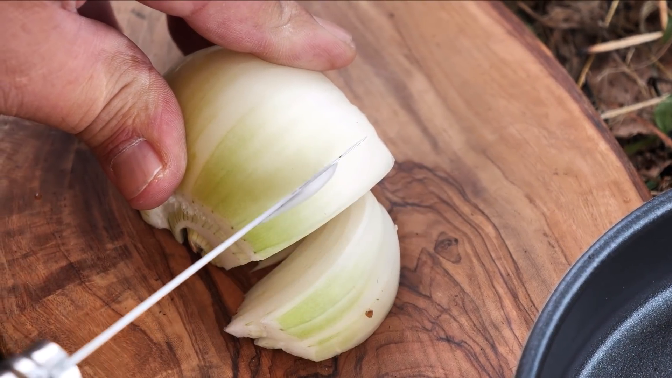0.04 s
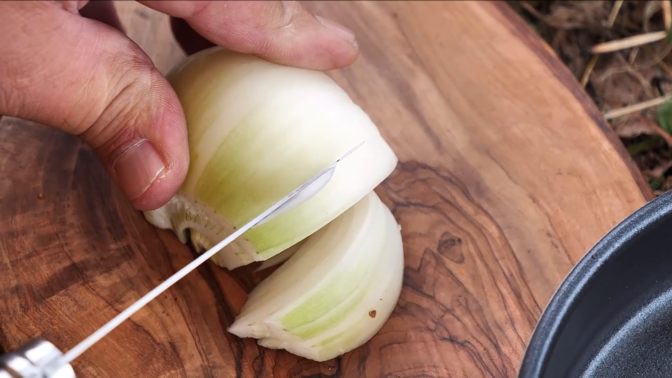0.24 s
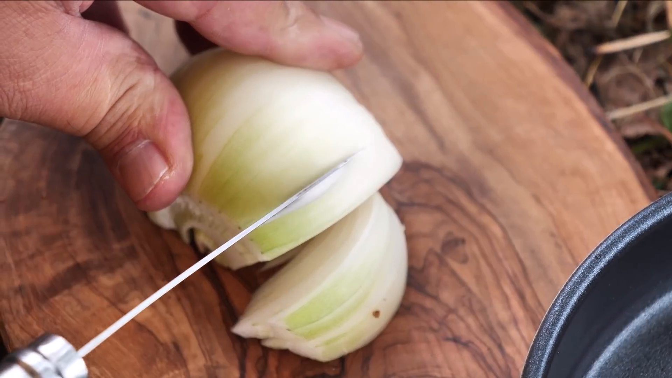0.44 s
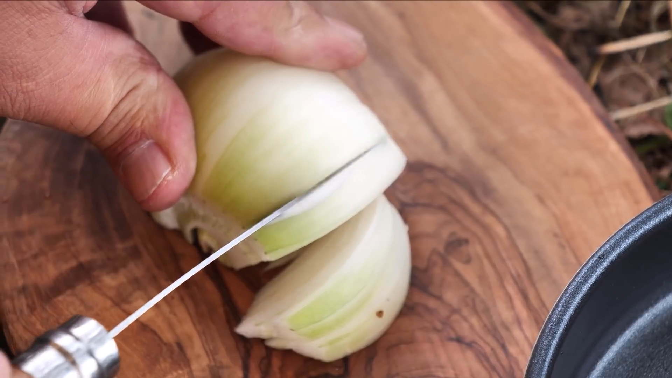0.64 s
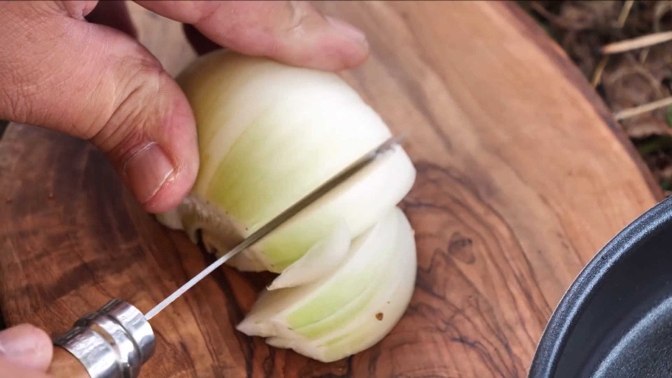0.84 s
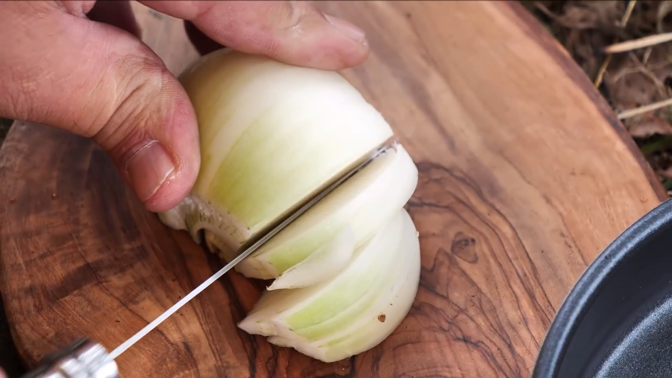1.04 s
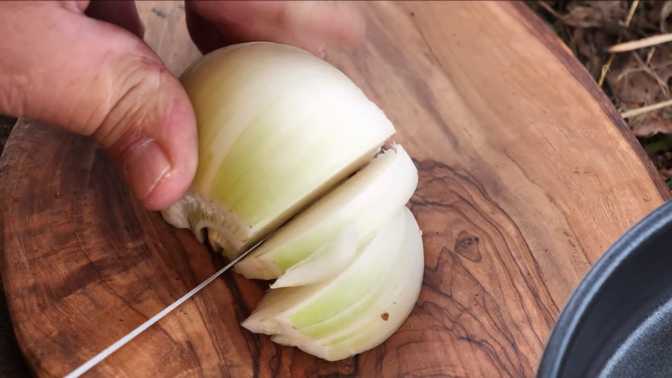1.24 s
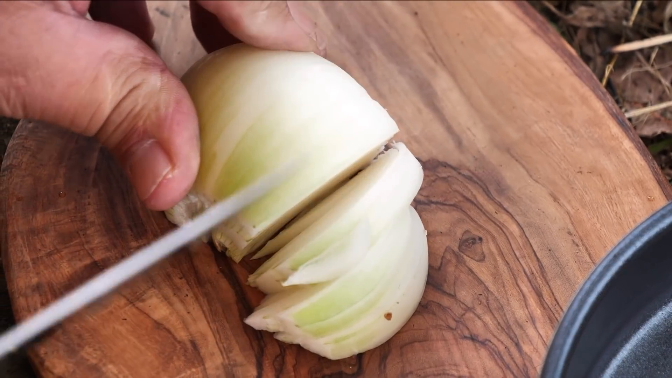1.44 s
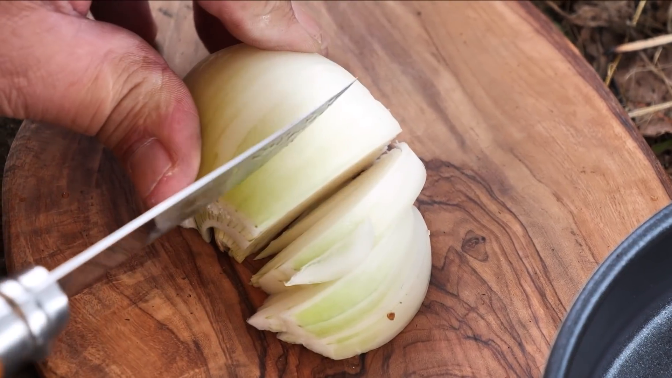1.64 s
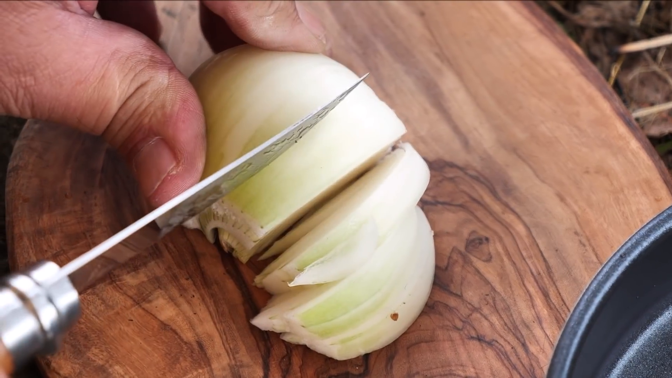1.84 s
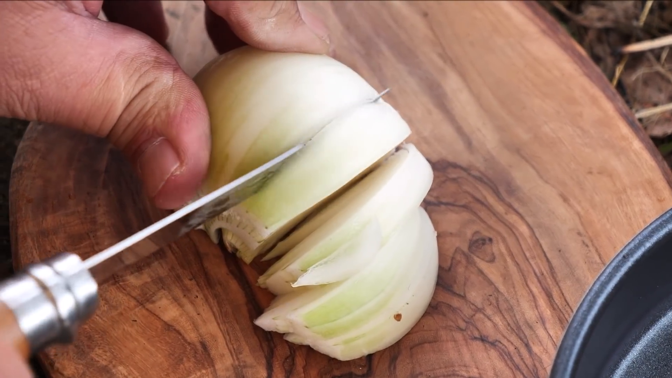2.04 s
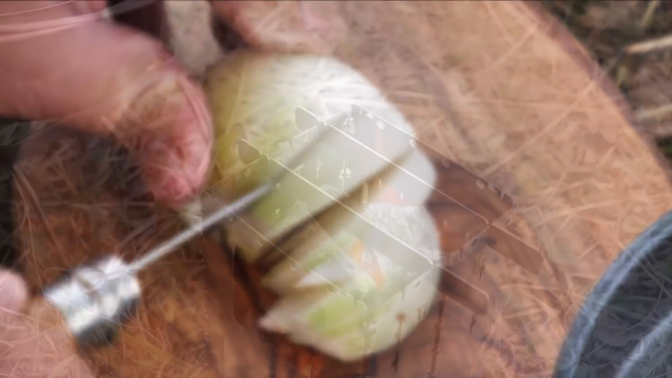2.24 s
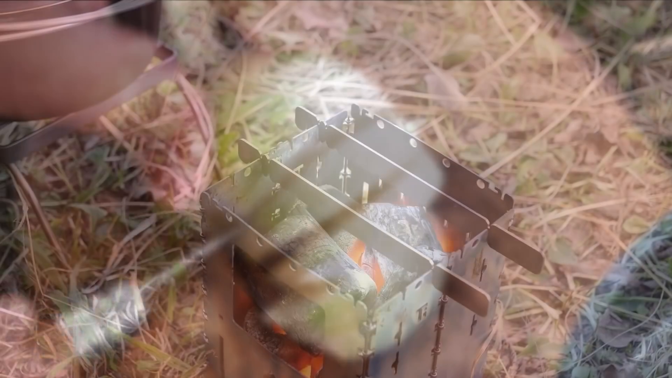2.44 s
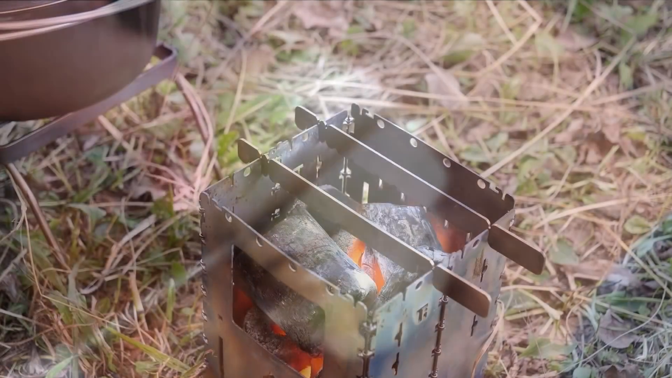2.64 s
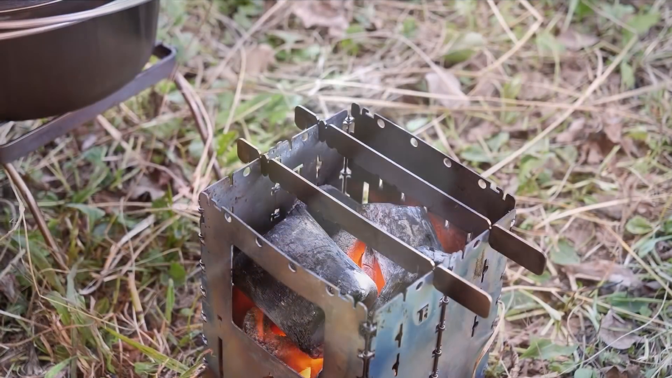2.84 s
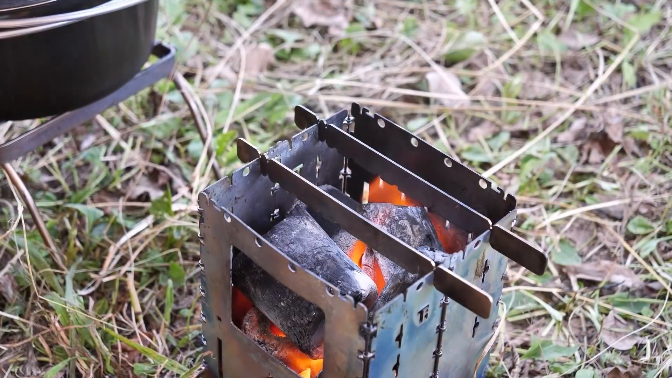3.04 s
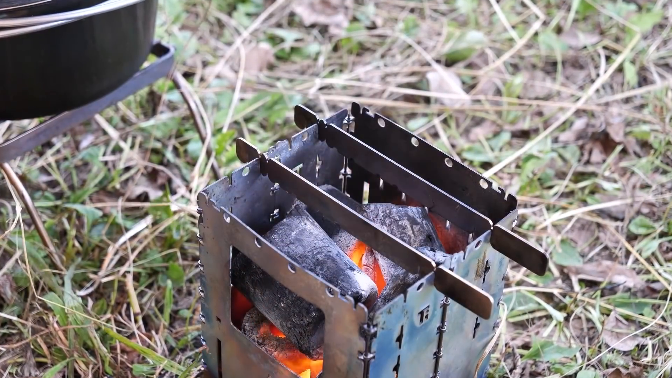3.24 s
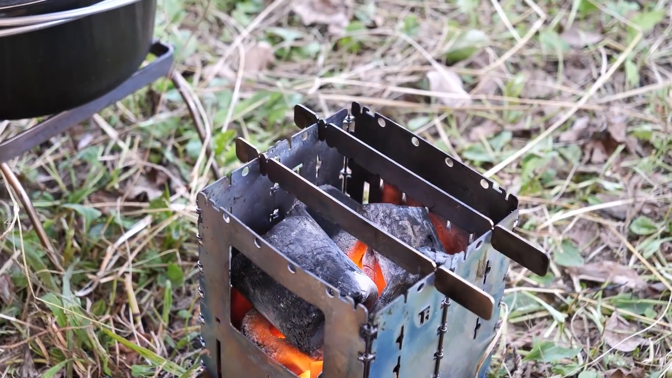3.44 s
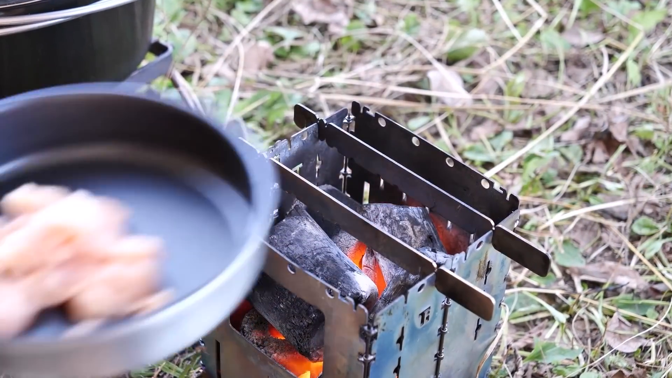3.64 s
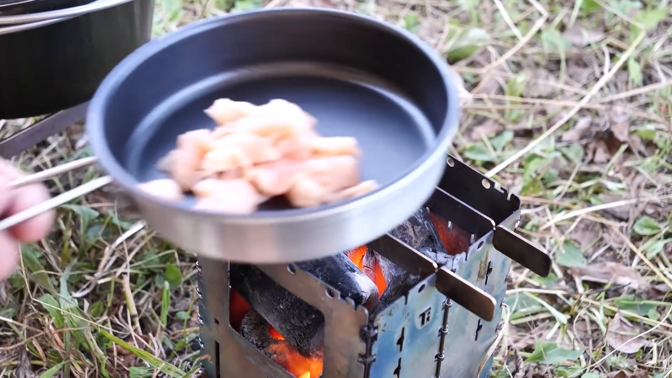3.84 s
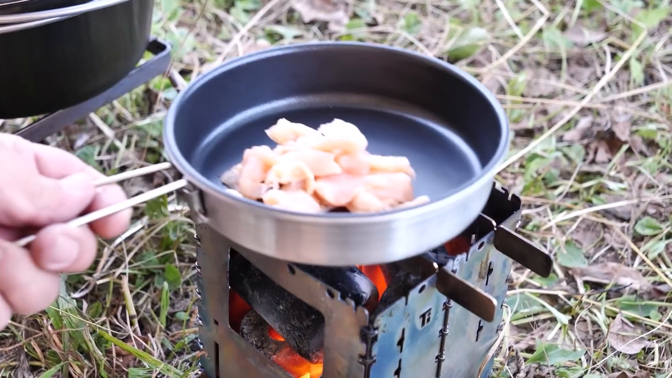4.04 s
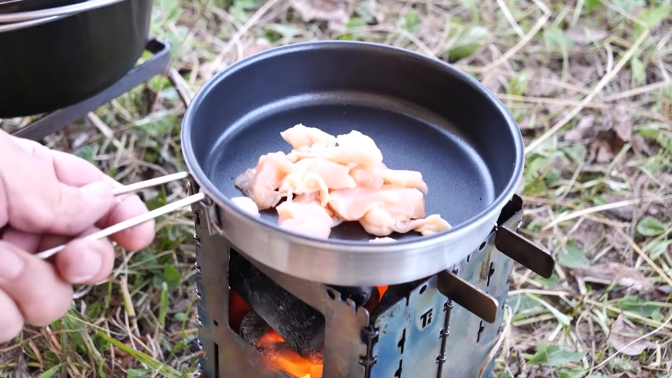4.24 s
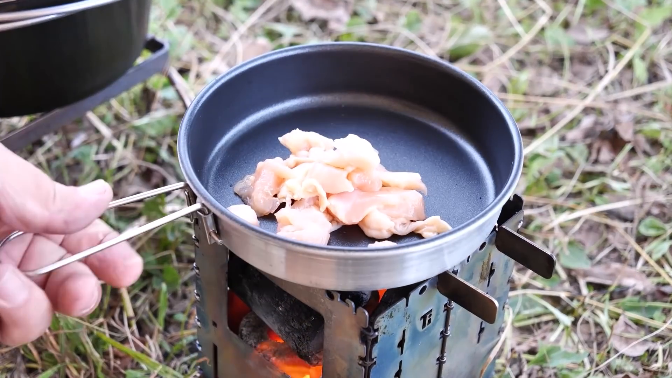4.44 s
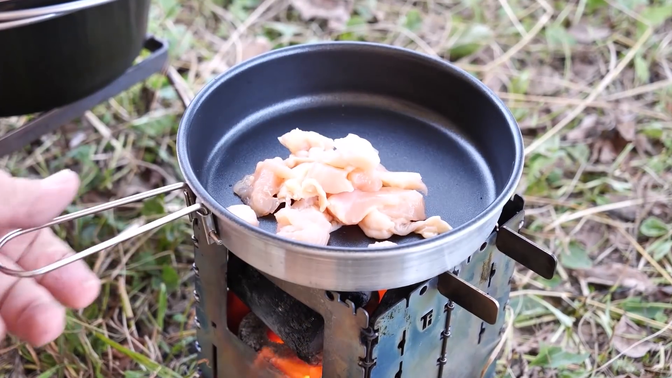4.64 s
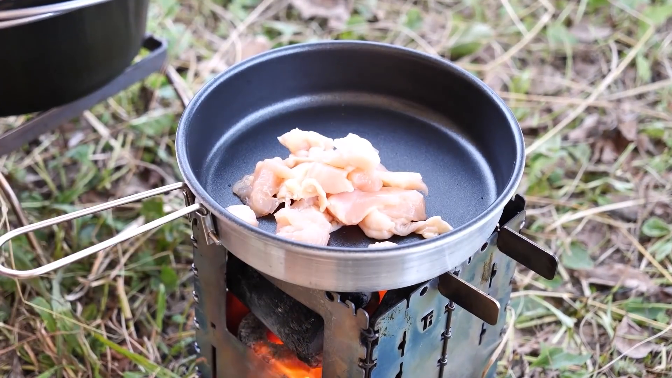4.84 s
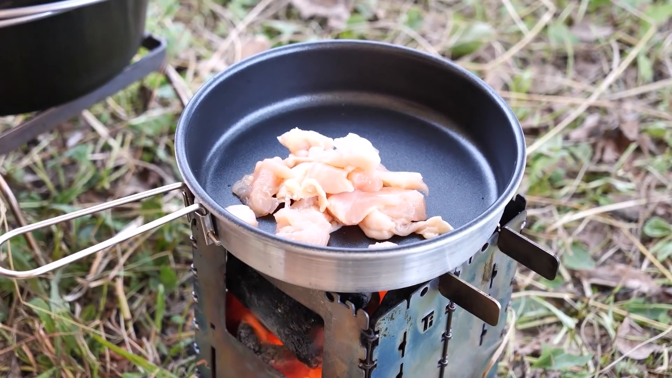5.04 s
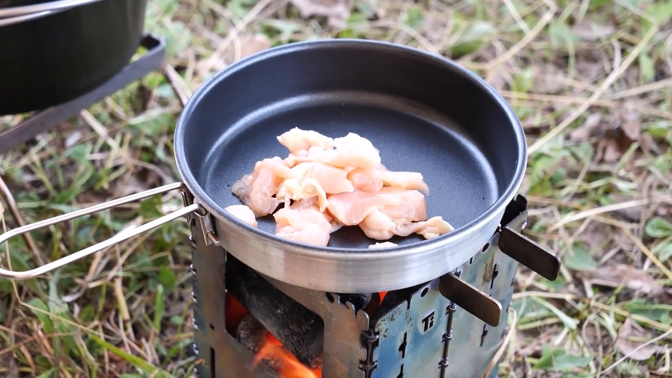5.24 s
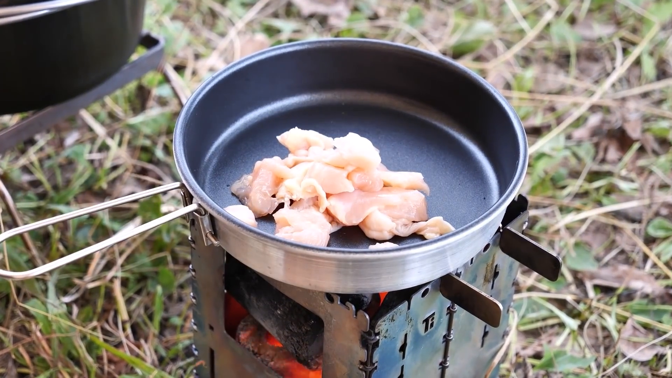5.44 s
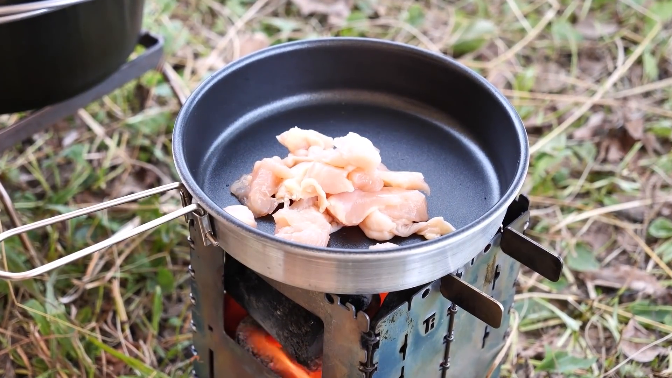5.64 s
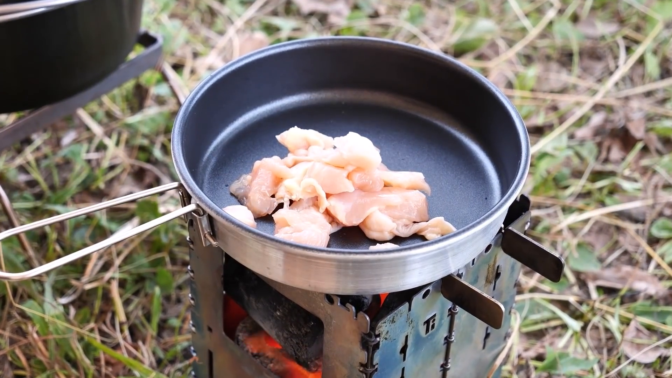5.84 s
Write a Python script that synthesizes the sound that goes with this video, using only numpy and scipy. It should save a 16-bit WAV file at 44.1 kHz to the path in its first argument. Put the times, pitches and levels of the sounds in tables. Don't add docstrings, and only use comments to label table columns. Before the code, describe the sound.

Close outdoor stereo sound: a blade slowly crunches into an onion and knocks sharply on a wooden board just before one second, squeaks faintly back, then makes two quick crisp cuts. The scene melts into a bubbling pot and snapping embers over soft fire rumble. Around four seconds a thin metal pan rattles unevenly onto metal bars, scrapes and settles, leaving simmering and plops.

```python
import sys
import numpy as np
from scipy import signal
from scipy.io import wavfile

SR = 44100
rng = np.random.default_rng(int(sys.argv[2]) if len(sys.argv) > 2 else 0)


def magnitude_from_level(level_db):
    exponent = np.asarray(level_db, float) / 20
    return 10 ** exponent


def generate_wav(signal):
    frames = np.transpose(np.atleast_2d(signal))
    scaled = np.clip(frames, -1, 1) * 32767
    pcm = np.round(scaled).astype(np.int16)
    wavfile.write(sys.argv[1], SR, pcm)


N = 260471
T = np.arange(N) / SR
KNIFE_LAG, PAN_LAG = 9, 6

# [t/s, level/dB]
BOIL = [(0.0, -57), (0.57, -55.5), (0.97, -54), (1.3, -59.5), (1.87, -65.5), (2.25, -65), (2.68, -63),
        (2.94, -59.5), (3.31, -54.5), (3.62, -50.5), (3.87, -55), (4.13, -51), (4.44, -51.5), (4.79, -54.5),
        (5.03, -52.5), (5.26, -53.5), (5.45, -52), (5.91, -54)]


def unit(x):
    return x / np.sqrt(np.mean(x ** 2) + 1e-20)


def peak_one(x):
    return x / np.abs(x).max()


def filtered(x, order, hz, kind):
    return signal.sosfilt(signal.butter(order, hz, kind, fs=SR, output="sos"), x)


def curve(tables):
    return sum(magnitude_from_level(np.interp(T, *np.array(rows).T, -150, -150)) for rows in tables)


def on_log(points, hz):
    table_hz, value = np.array(points).T
    return np.interp(np.log(hz), np.log(table_hz), value)


def drift(rate_hz):
    r = np.exp(-80 * np.pi * rate_hz / SR)
    slow = signal.lfilter([1], [1, -2 * r, r * r], rng.standard_normal(N // 40 + 2002))[2000:]
    return np.interp(np.arange(N) / 40, np.arange(len(slow)), unit(slow))


def ring(force, hz, t60_s):
    r, w = magnitude_from_level(-60 / (t60_s * SR)), 2 * np.pi * hz / SR
    return signal.lfilter([0, np.sin(w)], [1, -2 * r * np.cos(w), r * r], force + 1e-18)


def resonate(x, peaks):
    out = 0
    for k, (hz, width_hz, db) in enumerate(peaks):
        r = np.exp(-np.pi * width_hz / SR)
        top = magnitude_from_level(db) * (-1) ** k * (1 - r * r) / 2
        out = out + signal.lfilter([top, 0, -top], [1, -2 * r * np.cos(2 * np.pi * hz / SR), r * r], x)
    return out


def grains(per_s, spread_db):
    hits = rng.random(N) < per_s / SR
    size = magnitude_from_level(spread_db * np.minimum(rng.exponential(1, N), 4))
    return hits * size * rng.choice([-1, 1], N)


def add(out, s, sound, pan_db, lag=0):
    for side, part in enumerate(sound * magnitude_from_level([[pan_db / 2], [-pan_db / 2]])):
        at = round(s * SR) + lag * side
        out[side, at:at + len(part)] += part[:N - at]


def contact(chatter_ms, size=7000):
    t = 1000 * np.arange(size) / SR / chatter_ms
    return rng.standard_normal(size) * (rng.random(size) < .4) * t * np.exp(-t)


def tuned(chatter_ms, hz, turn):
    force = np.abs(contact(chatter_ms))
    return force * np.cos(2 * np.pi * hz * np.arange(len(force)) / SR + turn)


def touched(chatter_ms, hz, t60_s, turn):
    return peak_one(ring(tuned(chatter_ms, hz, turn), hz, t60_s))


def struck(chatter_ms, modes, uneven_db, apart, crack, top_hz=11500):
    def mix(turn):
        rings = [magnitude_from_level(db + uneven_db * rng.standard_normal()) * touched(chatter_ms, hz, t60_s, turn)
                 for hz, db, t60_s in modes]
        span_hz = [0.66 * min(modes)[0], 0.94 * max(modes)[0]]
        broad = filtered(contact(3 * chatter_ms), 2, span_hz, "band")
        return peak_one(sum(rings)) + crack * peak_one(broad)
    pair = mix(0) + apart * mix(np.pi / 2) * [[1], [-1]]
    return filtered(pair, 3, [353, top_hz], "band")


def pop(hz, cycles, size=1500):
    t = np.arange(size) * hz / SR
    dip = -np.exp(-((t - .3) / .13) ** 2)
    return peak_one(filtered(dip + 0.022 * ring(dip, hz, cycles / hz), 2, 230, "high"))


def banded(spectrum, low_hz, count, patchy_db):
    # [f/Hz, correlation]
    likeness = [(25, -0.39), (60, 0.89), (125, 0.96), (250, 0.79), (500, 0.37), (1000, -0.16),
                (2000, 0.092), (4000, 0.029), (8000, -0.029), (15000, 0.032)]
    out, shared, edges = 0, drift(20.0), low_hz * 2 ** (np.arange(count + 1) / 2)
    white = rng.standard_normal((2, 2, N))
    for k, (low, high) in enumerate(zip(edges, np.minimum(edges[1:], .45 * SR))):
        mid, side = filtered(white[k % 2], 2, [low, high], "band")
        centre_hz = np.sqrt(low * high)
        alike = np.clip(on_log(likeness, centre_hz), -1, 1)
        gain = magnitude_from_level(on_log(spectrum, centre_hz) + patchy_db * (0.5 * shared + 1.14 * drift(25.7)))
        out = out + gain * (np.sqrt(1 + alike) * mid + np.sqrt(1 - alike) * side * [[1], [-1]])
    return unit(out)


def slicing():
    # [t/s, crunch level/dB]
    strokes = [
        [(0.48, -76), (0.544, -62), (0.554, -56), (0.582, -61.5), (0.65, -64.5), (0.708, -51.5), (0.844, -56),
         (0.916, -40.5), (0.919, -40.5)],
        [(2.015, -88), (2.032, -60), (2.066, -55), (2.082, -63), (2.092, -49), (2.127, -52.5), (2.171, -61),
         (2.227, -78)],
        [(2.23, -80), (2.251, -64), (2.285, -60), (2.315, -56), (2.335, -53.5), (2.36, -47), (2.385, -47),
         (2.401, -44), (2.413, -47)],
    ]
    # [f/Hz, width/Hz, level/dB]
    crunch_peaks = [(3480, 1250, -0.5), (5200, 1220, -0.5), (6900, 1330, -3.5), (2280, 1200, -5.5)]
    # [f/Hz, width/Hz, level/dB]
    spray_peaks = [(8050, 1960, -0.5), (10700, 2500, 1), (12800, 5100, -5)]
    # [t/s, level/dB]
    squeak_level = [(1.355, -73), (1.37, -57), (1.385, -69), (1.419, -58), (1.432, -78)]
    # [f/Hz, width/Hz, level/dB]
    squeak_peaks = [(5400, 360, -2), (6280, 75, 9), (8330, 140, -4), (10800, 400, -23)]
    tear_on_s, tear_fall_db = [.07, .05, .016], [42, 30, 30]
    spray_db, skin_db = [-2, -9, -5.5], [-12, -4, -8]
    clumps = magnitude_from_level(2.2 * drift(66) + drift(207))
    pushes = [curve([rows + [(rows[-1][0] + on_s, rows[-1][1] - fall_db)]])
              for rows, on_s, fall_db in zip(strokes, tear_on_s, tear_fall_db)]
    layers = [
        (sum(pushes), crunch_peaks),
        (magnitude_from_level(spray_db) @ pushes, spray_peaks),
        (magnitude_from_level(skin_db) @ pushes, [(7780, 810, 0)]),
        (magnitude_from_level(-12 + 44.0) * sum(pushes) ** 2, [(900, 2200, 0)]),
    ]
    out = 0
    for gain, peaks in layers:
        near, apart = (unit(resonate(resonate(grains(3000, 2.5), peaks), peaks)) for _ in range(2))
        pair = 0.95 * near * magnitude_from_level([[1.2], [-1.2]]) + 0.99 * apart * [[1], [-1]]
        out = out + gain * clumps * magnitude_from_level(1.25 * drift(29)) * pair
    out = filtered(out, 3, 12800, "low")
    squeak = unit(resonate(grains(700, 4.3), squeak_peaks))
    return out + curve([squeak_level]) * magnitude_from_level(4.2 * drift(70)) * squeak * magnitude_from_level([[4], [-4]])


def thump():
    # [f/Hz, level/dB, t60/s]
    board_modes = [(430, -11, .024), (630, 0, .026), (740, -9, .014)]
    push = np.zeros(4000)
    push[:30] = np.hanning(30)
    rings = sum(magnitude_from_level(db) * ring(push, hz, t60_s) for hz, db, t60_s in board_modes)
    return peak_one(filtered(rings, 3, [340, 860], "band"))


def knocks():
    # [t/s, blade level/dB, thump level/dB, clack level/dB]
    chops = [
        (0.9243, -9, -16, -19.5),
        (0.9262, -17, -45, -19.5),
        (0.93, -23, -42, -34),
        (.985, -38, -54, -61),
        (2.4138, -22, -31, -36),
    ]
    # [f/Hz, level/dB, t60/s]
    blade_modes = [(2890, -15, 0.015), (3230, -5.5, 0.016), (3880, -11, 0.015), (4244, -9, 0.015),
                   (4690, -7.5, 0.013), (5050, -11, .012), (5920, -1, 0.012), (6420, 1, 0.012),
                   (7050, -8, .008), (7900, -11.5, 0.008), (8930, -15, 0.0071), (10600, -22, .005),
                   (12600, -24, 0.0027)]
    # [f/Hz, level/dB, t60/s]
    clack_modes = [(1487, 3.5, 0.024), (1950, 2.5, 0.017), (2160, -2.5, 0.0097)]
    # [t/s, peak level/dB, f/Hz, left-right/dB]
    bumps = [(0.454, -45.5, 397, -1.0), (0.521, -38.5, 714, -1.5), (0.656, -62, 398, 5),
             (0.845, -40, 1010, -8), (1.175, -47.5, 398, 4), (0.66, -44, 1100, 0), (0.951, -36.5, 1000, 0),
             (0.974, -46, 700, 0), (0.918, -38, 650, 2), (1.361, -51.5, 496, -3), (1.896, -51.5, 600, 2),
             (2.04, -54, 314, 4), (2.258, -48.5, 375, 3), (2.414, -44, 680, 3)]
    out = np.zeros((2, N))
    for s, blade_db, thump_db, clack_db in chops:
        blade = struck(0.092, blade_modes, 1.0, apart=0.71, crack=0.32, top_hz=13500)
        add(out, s, magnitude_from_level(blade_db) * blade, 2.5, lag=KNIFE_LAG)
        add(out, s - .001, magnitude_from_level(thump_db) * thump(), 3.1, lag=KNIFE_LAG)
        clack = struck(0.29, clack_modes, 0.98, apart=1.0, crack=0.25)
        add(out, s, magnitude_from_level(clack_db) * clack, -1.2, lag=KNIFE_LAG)
    for s, db, hz, pan_db in bumps:
        add(out, s, magnitude_from_level(db) * pop(hz, 12.0), pan_db)
    return out


def pan():
    # [t/s, bottom f/Hz, bottom level/dB, wall level/dB,
    # rim level/dB]
    set_down = [(4.0641, 790, -31, -59, -70), (4.0846, 820, -29.5, -60, -72),
                (4.1543, 1230, -21.5, -20.5, -35), (4.162, 1270, -24.5, -32, -41),
                (4.215, 1160, -34, -58, -52), (4.249, 776, -36, -59, -62), (4.2534, 1000, -11.5, -24, -35),
                (4.257, 718, -27, -32, -44), (4.2859, 1100, -21, -44, -45), (4.293, 1160, -23, -48, -45),
                (4.325, 1160, -37, -52, -62), (4.335, 1230, -41, -38, -38), (4.359, 1140, -15, -17.5, -18),
                (4.3697, 1145, -15.5, -19.5, -27), (4.3897, 1060, -16, -22, -22.5),
                (4.395, 1070, -22, -31, -40), (4.4735, 1200, -42.5, -58, -66)]
    # [f/Hz, level/dB, t60/s]
    bottom_modes = [(1100, -30, 0.036), (1160, -29, 0.076), (1230, -26.5, 0.13), (345, -21, 0.018),
                    (725, -29, 0.092), (1700, -36, 0.065), (2145, -27.5, 0.086)]
    # [f/Hz, level/dB, t60/s]
    wall_modes = [(2440, 5, 0.045), (2690, 15, 0.011), (3430, 7.5, 0.025), (3830, 2, 0.03),
                  (4244, 9, 0.012), (4520, -2, 0.034), (4930, 7, 0.013), (5270, 4, 0.037), (5355, 9, 0.016)]
    # [f/Hz, level/dB, t60/s]
    rim_modes = [(6100, 5, 0.0068), (6270, 11, 0.018), (6240, -13, 0.017), (6540, -11, 0.021),
                 (7920, 7, 0.0091), (8300, -7, 0.028), (8300, -8, .03), (9340, 2, 0.02),
                 (11200, -3.5, 0.013), (10950, -21, 0.026)]
    # [t/s, level/dB, hold/s]
    slides = [
        (4.165, -45.5, 0.017),
        (4.247, -50, 0.049),
        (4.365, -40.5, 0.017),
    ]
    rest_t60_s = 0.014
    rise_s, fall_s, swing_db = 0.021, 0.056, 15.5
    out = np.zeros((2, N))
    for s, bottom_hz, bottom_db, wall_db, rim_db in set_down:
        bottom = struck(0.27, [(bottom_hz, 0, rest_t60_s)] + bottom_modes, 1.0, apart=0.084, crack=0.39)
        add(out, s, magnitude_from_level(bottom_db) * bottom, -1.5, lag=PAN_LAG)
        wall = struck(1.0, wall_modes, 0.53, apart=0.5, crack=0.67)
        add(out, s, magnitude_from_level(wall_db) * wall, -.4, lag=PAN_LAG)
        rim = struck(0.48, rim_modes, 3.1, apart=1.0, crack=0.33)
        add(out, s, magnitude_from_level(rim_db) * rim, .4, lag=PAN_LAG)
    rub = np.array([grains(4000, 4.3) for _ in range(2)])
    hum = unit(sum(ring(rub, hz, t60_s) for hz, db, t60_s in bottom_modes[:3]))
    shell = unit(sum(magnitude_from_level(db) * ring(rub, hz, 0.19 * t60_s) for hz, db, t60_s in wall_modes + rim_modes))
    rasp = magnitude_from_level(-3) * unit(resonate(rub, [(600, 1800, -9.0), (1790, 370, 6)]))
    slide = filtered(shell + 0.71 * hum + rasp, 3, 9500, "low")
    moving = curve([[(s - rise_s, db - swing_db), (s, db), (s + hold_s, db),
                     (s + hold_s + fall_s, db - swing_db)] for s, db, hold_s in slides])
    return out + moving * (slide[0] + 0.73 * slide[1] * [[1], [-1]])


def clear_notes():
    # [t/s, f/Hz, peak level/dB, t60/s, left-right/dB]
    metal_notes = [(4.2542, 1640, -16.5, 0.028, 4), (4.2545, 2370, -26.5, 0.032, -1),
                   (4.2545, 1860, -25, 0.035, -2), (4.2545, 4250, -28.5, 0.035, 3),
                   (4.259, 1500, -27, 0.034, 1), (4.157, 3600, -25, 0.029, -2),
                   (4.1545, 4813, -31.5, .04, 2), (4.1545, 5286, -28.5, 0.042, 1),
                   (4.1545, 6137, -36, .05, 0), (4.1545, 5700, -37.5, .05, 1), (4.1545, 9426, -41, .03, 1),
                   (4.1545, 11250, -53, .1, 0), (4.1625, 1205, -37, .2, -1), (4.2542, 5744, -30.5, .02, -1),
                   (4.2542, 7677, -35, .02, 3), (4.2542, 9550, -39, .025, 0),
                   (4.2542, 11300, -39.5, 0.01, -2), (4.3697, 1100, -16, .036, -4),
                   (4.394, 3900, -32.5, 0.018, -1), (4.391, 5292, -27, 0.027, 1),
                   (4.391, 8134, -34, .03, 1), (4.3245, 4900, -46, .02, 0), (4.396, 800, -31, .09, 1),
                   (4.3705, 4050, -31, .04, 0), (4.361, 8800, -35, .02, 0), (4.372, 8780, -43, .03, 1),
                   (4.287, 1152, -34, .06, -3), (4.361, 360, -34.5, 0.026, -1), (4.392, 365, -30.5, .03, 0),
                   (4.404, 1225, -38, 0.12, -1), (4.39, 1600, -28, .03, 1), (4.371, 1600, -27, .03, -1),
                   (2.4145, 4250, -54, .12, 2), (4.371, 2290, -25.5, 0.044, -1),
                   (2.7096, 5300, -39, 0.011, 5), (2.7096, 5900, -47, .03, 5), (2.7135, 3900, -50, .012, 5),
                   (2.712, 2000, -55.5, .06, 3), (2.7125, 4970, -50, 0.033, 5)]
    # [t/s, f/Hz, peak level/dB, t60/s]
    knock_notes = [(0.9246, 1500, -30, .02), (0.9246, 6480, -21, .006), (0.9246, 5940, -19, .008),
                   (0.924, 8800, -28, .007), (0.9265, 1920, -21, .016), (0.9265, 2150, -29, .014),
                   (0.9246, 7040, -27, .008), (0.9246, 4980, -26, .01), (0.929, 4740, -31, .02),
                   (0.929, 4230, -30, 0.028), (2.4141, 2990, -29, 0.016), (2.4141, 6260, -23, .011),
                   (2.4141, 6650, -27, .01), (2.4141, 7600, -37, .012), (2.4141, 8500, -32, .009),
                   (2.4155, 4050, -34, .02), (2.4155, 4830, -39, .015), (2.4141, 5600, -40, .012),
                   (2.4141, 3600, -31, .012)]
    out = np.zeros((2, N))
    for s, hz, db, t60_s, pan_db in metal_notes:
        pair = np.array([touched(0.067, hz, t60_s, turn) for turn in (0, 0.6)])
        add(out, s, magnitude_from_level(db) * pair, pan_db)
    for s, hz, db, t60_s in knock_notes:
        pair = np.array([touched(0.063, hz, t60_s, turn) for turn in (0, 1.3)])
        add(out, s, magnitude_from_level(db) * pair, 0.3)
    return out


def pot():
    # [t/s, peak level/dB, f/Hz, left-right/dB]
    fire_pops = [(3.499, -40, 840, -2.5), (5.059, -66, 460, -1), (5.642, -60, 544, 0), (2.758, -45.5, 290, 1),
                 (2.771, -54, 337, 10), (2.789, -46.5, 292, 0), (2.929, -50, 334, 2), (3.074, -43.5, 527, 3),
                 (3.089, -50, 559, 12), (3.202, -53, 468, 9), (3.336, -44.5, 493, -5), (3.447, -49, 290, -6),
                 (3.48, -40, 777, -7), (3.576, -41.5, 327, 2), (3.611, -35, 860, -5), (3.667, -35.5, 937, -2.5),
                 (3.7785, -41, 794, -1.0), (4.042, -49, 804, 0), (4.696, -44, 550, -3), (4.716, -37, 907, 0.5),
                 (4.812, -42, 866, -1.0), (4.958, -43, 880, -6), (5.008, -35.5, 810, -5), (5.017, -35, 885, -4),
                 (5.033, -33.5, 600, 1), (5.212, -37, 884, -2.0), (5.22, -43.5, 926, -9), (5.531, -38, 900, -4),
                 (5.569, -42, 790, -3)]
    # [f/Hz, density/dB]
    simmer_spectrum = [(150, -32), (250, -1.5), (540, 0.5), (624, -12.5), (842, -0.5), (1300, -5),
                       (2500, -6.5), (3250, -49), (5500, -120)]
    pop_t60_s = 0.059
    out = np.zeros((2, N))
    for s, db, hz, pan_db in fire_pops:
        add(out, s, magnitude_from_level(db + 1) * pop(hz, pop_t60_s * hz), pan_db)
    small = np.abs(grains(250 * magnitude_from_level(5 * drift(9.1)), 4.0))
    dealt = rng.integers(0, 6, N)
    small_pops = sum(signal.fftconvolve(small * (dealt == k), pop(hz, 1.3))[:N]
                 for k, hz in enumerate(np.geomspace(350, 1300, 6)))
    busy = np.interp(T, [2.3, 3.0], [.3, 1.])
    seethe = 0.69 * banded(simmer_spectrum, 242.7, count=6, patchy_db=3.0)
    return out + curve([BOIL]) * (busy * 0.3 * unit(small_pops) * magnitude_from_level([[-1.5], [1.5]]) + seethe)


def gurgle():
    # [t/s, level/dB, spread/s]
    swells = [(2.03, -67.5, 0.013), (2.775, -62, 0.027), (2.93, -62, 0.0092), (3.11, -54.5, 0.039),
              (3.26, -57.5, 0.093), (4.1, -47, 0.028), (5.04, -49.5, 0.034)]
    swell = sum(magnitude_from_level(db) * np.exp(-((T - s) / spread_s) ** 2) for s, db, spread_s in swells)
    low = resonate(grains(700, 4.0), [(334, 254, -3.0), (526, 114, 3.0), (790, 120, -8.0)])
    return swell * unit(low) * magnitude_from_level([[-1.4], [1.4]])


def ticks():
    # [t/s, peak level/dB, f/Hz, left-right/dB]
    snaps = [(0.1419, -42, 5200, 10), (0.165, -39, 4900, 7), (0.5525, -34, 3500, 3),
             (0.755, -38.5, 6000, 20), (1.3178, -35, 2860, 0), (1.363, -42, 5500, 3),
             (1.3915, -35, 6100, 1), (1.769, -46, 2860, -2), (1.771, -46, 7500, 0), (1.132, -45, 4500, 0),
             (0.853, -41, 2500, 0), (2.14, -43, 6100, 0), (2.072, -45, 2500, 0), (1.931, -49, 5600, -1),
             (2.041, -36.5, 3200, -1), (2.09, -41, 7600, -2), (2.1207, -35.5, 5300, -3),
             (2.2535, -39, 5530, -5), (2.5936, -38, 8200, 5.5), (2.0602, -42, 7800, 0),
             (2.3142, -39, 4890, 0), (0.6999, -37, 5320, 3), (0.6435, -42, 2920, 0), (1.862, -52, 3100, 0),
             (2.71, -40, 7200, 5), (2.7095, -38, 4500, 3), (1.416, -41, 6000, 1), (3.0108, -38, 5500, 8),
             (3.0263, -34.5, 7900, 6), (3.139, -45, 3050, 10), (3.308, -43, 2970, 5), (3.398, -46, 4700, 5),
             (3.544, -40, 3800, 1.0), (3.624, -39, 3200, 4), (3.717, -38, 3600, 1), (3.7876, -27, 10900, 1),
             (3.983, -38, 5300, 0), (4.0386, -39, 3800, 2), (4.587, -38.5, 4930, 1), (4.613, -36, 2900, 0),
             (5.2945, -42, 2800, 11), (5.3848, -37.5, 3100, 4)]
    rise_ms, fall_ms = .15, 1.7
    ms = 1000 * np.arange(2500) / SR
    out = np.zeros((2, N))
    for s, db, hz, pan_db in snaps:
        force = rng.standard_normal((2, 2500)) * (1 - np.exp(-ms / rise_ms)) * np.exp(-ms / fall_ms)
        snap = ring(force, hz, 11.6 / hz)
        snap = snap + 0.32 * ring(force, 0.7 * hz, 6.4 / hz) + 0.45 * ring(force, 1.46 * hz, 8.4 / hz)
        snap = filtered(snap, 2, [1800, 12800], "band")
        pair = (snap[0] + snap[1] * [[1], [-1]]) / np.abs(snap[0]).max()
        add(out, s + .0005, magnitude_from_level(db - 5.5) * pair, pan_db)
    return out


def field():
    # [t/s, level/dB]
    fire_level = [(0.0, -55), (1.0, -56), (1.4, -57.5), (2.1, -64), (2.65, -59.5), (2.8, -53.5), (3.3, -51),
                  (4.05, -45.5), (4.45, -46.5), (4.8, -49), (5.45, -46), (5.7, -48.5), (5.91, -44)]
    # [f/Hz, density/dB]
    rumble_spectrum = [(12, -53), (20, -33), (75, 0), (134, 0.5), (203, -3.5), (308, -34), (382, -15),
                       (414, -18), (500, -18), (650, -48), (1100, -120)]
    # [f/Hz, density/dB]
    hiss_spectrum = [(710, -32), (1200, -2), (1520, -7.5), (2430, -4), (2980, -4), (4000, -5.5), (5240, -5),
                     (11600, -17.5), (14800, -22.5), (16000, -31)]
    # [t/s, level/dB]
    insect_level = [(0, -67), (.5, -67.5), (1.4, -71), (2.2, -88), (3.0, -74), (3.4, -72.5), (4.8, -67),
                    (5.91, -70)]
    rumble = curve([fire_level]) * banded(rumble_spectrum, 19.85, count=8, patchy_db=0.5)
    hiss = banded(hiss_spectrum, 1448, count=7, patchy_db=1.8)
    hiss_gain = magnitude_from_level(-60) * (curve([BOIL]) / magnitude_from_level(-56)) ** 0.58
    insect_peak = [(2990, 150, 0)]
    insects = np.array([unit(resonate(resonate(white, insect_peak), insect_peak))
                        for white in rng.standard_normal((2, N))])
    return rumble + hiss_gain * hiss + curve([insect_level]) * magnitude_from_level(2 * drift(5.4)) * insects


def scene():
    return slicing() + knocks() + pan() + clear_notes() + pot() + gurgle() + ticks() + field()


def top_cut(x):
    return signal.sosfilt(signal.butter(12, 16620, fs=SR, output="sos"), x)


def record(dry):
    cut = signal.ellip(10, .5, 70, 15750, fs=SR, output="sos")
    return top_cut(signal.sosfilt(cut, dry))


dry = scene()
out = record(dry)
generate_wav(out)
```